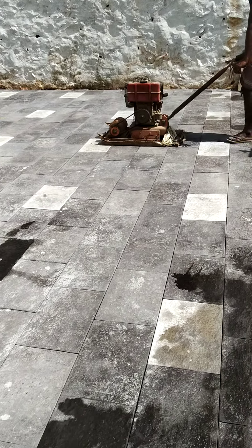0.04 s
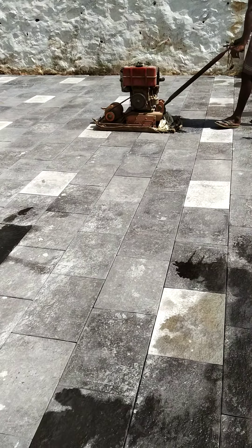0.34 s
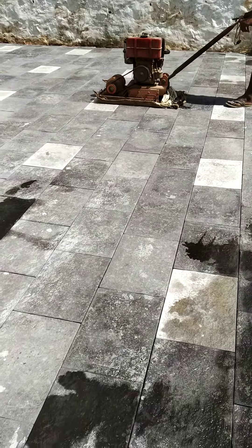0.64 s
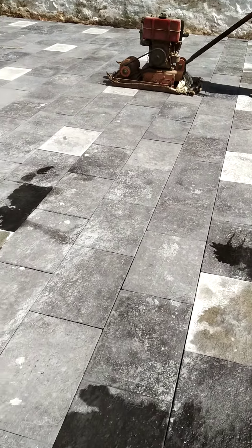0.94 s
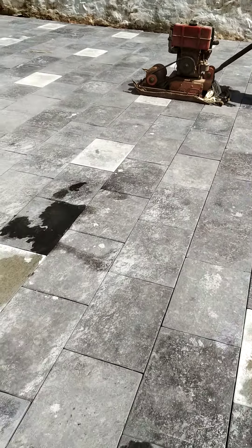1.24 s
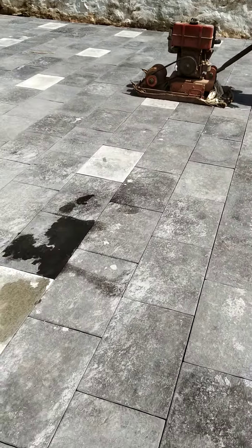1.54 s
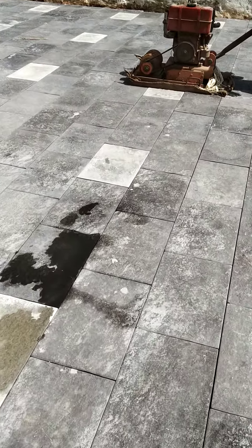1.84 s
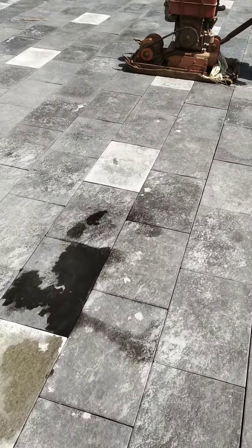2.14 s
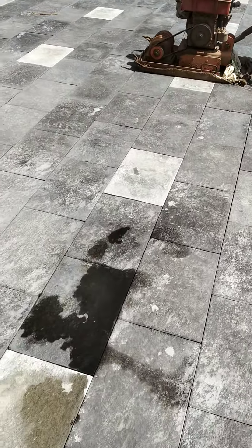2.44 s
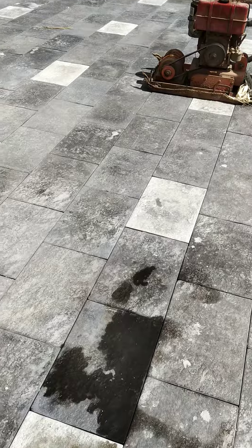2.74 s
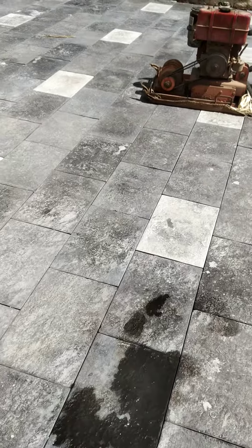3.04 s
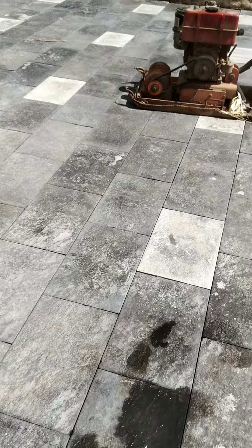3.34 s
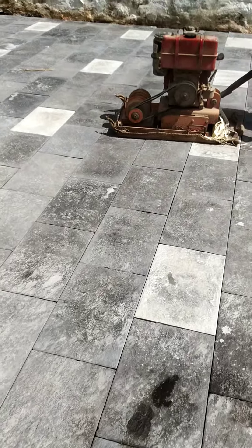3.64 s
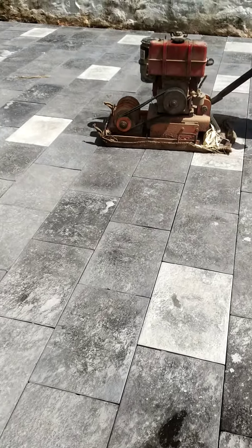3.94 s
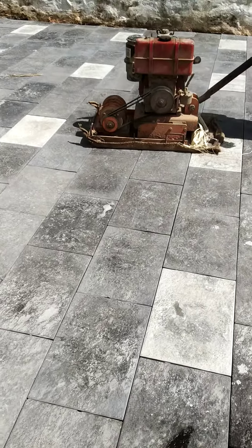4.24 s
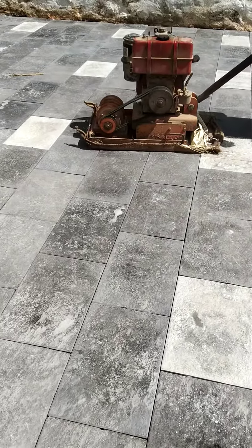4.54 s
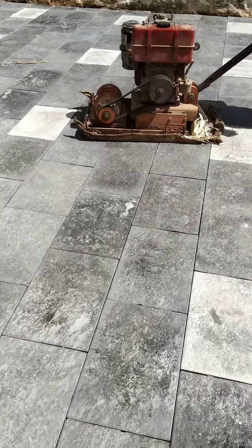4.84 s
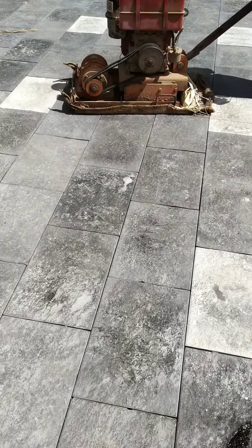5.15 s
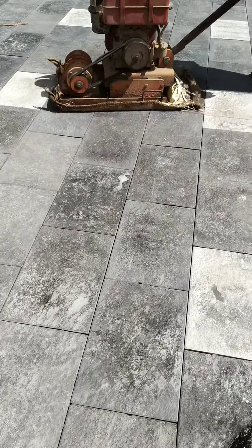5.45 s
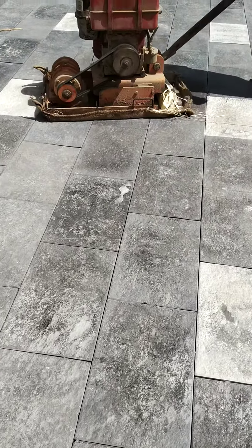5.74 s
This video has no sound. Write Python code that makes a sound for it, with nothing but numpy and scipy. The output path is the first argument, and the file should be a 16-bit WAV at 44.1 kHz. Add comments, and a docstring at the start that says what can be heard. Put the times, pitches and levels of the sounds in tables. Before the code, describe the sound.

A petrol plate compactor runs loudly for the whole of about six seconds, outdoors in a walled yard, heard in stereo. Its single-cylinder engine holds a steady, rapid beat, with a booming drone, a hollow exhaust bark and metallic ticking and rattling. The vibrating steel plate adds a low throbbing hum, hammers the paving tiles and grinds sand with a continuous hiss. Brief gritty, squealing scrapes stand out near 0.3, 0.8, 1.3 and 1.7 seconds. The tiles rattle harder around 1.1 and 1.7 seconds, and again near 3.9. A very faint high whistle of rubbing steel sits to the right, with tiny squeaks between 2.6 and 3.5 seconds. The hum is strongest from 3 to 4.5 seconds, and a quick metallic clinking comes forward from 4 to 4.7. The machine gradually sounds closer and fuller, still running at the end.

```python
"""A walled yard: a petrol plate compactor crawls closer over paving tiles.
Its four-stroke single booms, barks and ticks at about 24 cycles a second; a belt spins the eccentric
weight at 64 Hz, which throbs against the engine. The steel plate hammers the tiles and grinds sand,
with a few louder scrapes and a faint whistle of rubbing steel."""
import sys
import numpy as np
from scipy import signal
from scipy.fft import rfft, irfft, next_fast_len
from scipy.io import wavfile
from scipy.ndimage import uniform_filter1d, map_coordinates

SR = 44100
rng = np.random.default_rng(int(sys.argv[2]) if len(sys.argv) > 2 else 0)


def wrap_up_sound(samples):
    """Save the sound to the file named by the first command line argument, as 16-bit audio."""
    columns = np.atleast_2d(samples).T
    # keep every value between -1 and 1, then stretch to whole-number steps
    tamed = np.clip(columns, -1, 1)
    steps = np.round(tamed * 32767).astype(np.int16)
    wavfile.write(sys.argv[1], SR, steps)


N = 256220
TOP_HZ = 15700

# Each row: time in seconds, engine cycle rate in Hz, eccentric rate in Hz.
SHAFT_RATES = [(0.0, 23.92, 63.64), (0.45, 23.79, 63.79), (1.0, 23.87, 64.13), (1.7, 23.92, 63.96),
               (2.5, 23.96, 64.33), (3.3, 23.98, 64.06), (4.0, 23.83, 63.95), (4.5, 23.82, 63.68),
               (5.0, 23.76, 64.01), (5.4, 23.8, 63.58), (5.81, 23.84, 63.9)]
CYCLE_HZ = SHAFT_RATES[0][1]


def amp(db):
    """Decibels to gain."""
    return 10 ** (np.asarray(db) / 20)


def unit(x):
    """Scale to rms 1."""
    return x / np.sqrt(np.mean(x ** 2) + 1e-20)


def curves(rows):
    """Per-sample curve for each column after the time."""
    times_s, *columns = np.transpose(rows)
    return [np.interp(np.arange(N) / SR, times_s, column) for column in columns]


def bell(centre_s, width_s):
    """Gaussian envelope, 1/e at width_s from its centre."""
    return np.exp(-((np.arange(N) / SR - centre_s) / width_s) ** 2)


def swells(rows):
    """Sum of bell-shaped rises, in dB."""
    return sum(db * bell(centre_s, width_s) for centre_s, width_s, db in rows)


def approach(far_db, near_db):
    """Level in dB as the machine draws closer."""
    # Each row: time in seconds, nearness from 0 to 1.
    nearness = [(0, 0.19), (3, 0.5), (3.8, 0.74), (5.81, 1)]
    return far_db + (near_db - far_db) * curves(nearness)[0]


def wobble(rate_hz):
    """Smooth random curve through knots drawn at rate_hz."""
    knots = rng.standard_normal(int(N * rate_hz / SR) + 4)
    return map_coordinates(knots, [np.arange(N) * rate_hz / SR])


def noise():
    """White noise, independent in the two channels."""
    return rng.standard_normal((2, N))


def filtered(x, response):
    """Apply a complex frequency response."""
    size = next_fast_len(N + SR // 2)
    return irfft(rfft(x, size) * response(np.fft.rfftfreq(size, 1 / SR)), size)[..., :N]


def colour(points):
    """Response through (Hz, dB) points on a log axis."""
    hz, db = np.transpose(points)
    return lambda f: amp(np.interp(np.log(f + 1), np.log(hz), db))


def resonances(modes):
    """Causal response of (Hz, width in Hz, dB) modes, alternating in sign."""
    return lambda f: sum((-1) ** k * amp(db) * 1j * f * width / (hz * hz - f * f + 1j * f * width)
                         for k, (hz, width, db) in enumerate(modes))


def patchy(x, depth_db):
    """Vary the gain in random patches of time and frequency."""
    spectra = signal.stft(x, nperseg=512)[2]
    field = uniform_filter1d(rng.standard_normal(spectra.shape[1:]), size=9, axis=0)
    field = uniform_filter1d(field, size=12, axis=1)
    return signal.istft(spectra * amp(depth_db * unit(field)), nperseg=512)[1][:, :N]


def pulses(cycle, phase, spread_db=.8):
    """One impulse per engine cycle at the given phase, uneven in strength."""
    at = np.interp(np.arange(int(cycle[-1]) + 1) + phase, cycle, np.arange(N), left=-1, right=-1)
    at = np.round(at[at >= 0]).astype(int)
    return np.bincount(at, amp(spread_db * rng.standard_normal(len(at))), N)


def ring(x, t60_s, count=5):
    """Dense stereo ringing, crossfaded through several tails as the machine travels."""
    t = np.arange(SR // 8) / SR
    tails = rng.standard_normal((count, 2, len(t))) * amp(-60 * t / t60_s) * np.minimum(t / .004, 1)
    tails /= np.linalg.norm(tails, axis=-1, keepdims=True)
    travel = np.linspace(0, count - 1, N)
    return sum(np.sqrt(np.clip(1 - abs(travel - k), 0, 1))
               * signal.oaconvolve(x[None], tail, axes=1)[:, :N] for k, tail in enumerate(tails))


def placed(x, left_db, lag_s):
    """Mono to stereo: the left is left_db louder and lag_s later than the right."""
    side = np.array([[1], [-1]]) / 2
    return amp(left_db * side) * filtered(x, lambda f: np.exp(-2j * np.pi * f * lag_s * side))


def plate_hum(turns):
    """The eccentric shakes the plate: a throb once a turn, a hum twice a turn, wavering overtones."""
    # Each row: time in seconds, relative level in dB.
    throb_levels = [(0.08, -16.5), (2.66, -27.5), (3.65, -21), (5.5, -18), (5.7, -19)]
    hum_levels = [(0.0, -20), (.8, -17.5), (1.3, -14.5), (1.55, -16.5), (1.75, -18), (2.1, -12.5),
                  (2.55, -17), (3.0, -10), (3.7, -8.7), (4.05, -11), (4.45, -10.5), (4.68, -13.5),
                  (4.88, -22), (5.3, -19), (5.75, -17.5)]
    # Each row: multiple of the eccentric rate, level in dB.
    overtones = [(4, -33), (5, -38), (6, -38)]
    angle = 2 * np.pi * turns
    throb = amp(curves(throb_levels)[0] + 2 + .4 * wobble(11)) * np.cos(angle + .15)
    hum = amp(curves(hum_levels)[0] - 1 + .22 * wobble(9.1)) * np.cos(2 * angle)
    upper = sum(amp(db + 4.5 * wobble(4.95)) * np.cos(k * angle + np.pi * wobble(1.201))
                for k, db in overtones)
    return placed(throb + hum + upper, left_db=8.5, lag_s=.00011)


def engine_boom(cycle, waver_db, drift_turns):
    """Firing stroke and crank unbalance: clean low orders, a drone at order 8, unsteady high orders."""
    # Each row: time in seconds, relative level in dB.
    drone_levels = [(0.0, -35), (0.05, -24.5), (0.78, -23.5), (1.02, -29), (1.67, -29.5), (1.76, -22.5),
                    (2.04, -31), (2.39, -21.5), (2.86, -26), (3.17, -20.5), (4.13, -32), (4.4, -22.5),
                    (4.79, -25), (4.9, -18.5), (5.21, -23.5), (5.37, -36), (5.76, -21.5), (5.81, -44)]
    # Each row: multiple of the cycle rate, far level in dB, near level in dB.
    orders = [(2, -27.5, -20.5), (3, -31, -31.5), (4, -62, -24), (5, -21.5, -36), (6, -35, -28.5),
              (7, -38, -25.5), (9, -39.5, -37.5), (10, -37, -32), (11, -37.5, -46), (12, -35, -37),
              (13, -38, -41), (19, -37.5, -40), (23, -48, -39), (26, -52, -34.5)]
    tones = amp(curves(drone_levels)[0] + 2.5) * np.cos(2 * np.pi * 8 * cycle)
    for order, far_db, near_db in orders:
        looseness = min(order / 19, 1) ** 2
        level_db = approach(far_db, near_db) + waver_db * np.sqrt(looseness) * wobble(3.2)
        slip = looseness * (2 * rng.standard_normal() + drift_turns * wobble(.723))
        tones += amp(level_db) * np.cos(2 * np.pi * (order * cycle + slip))
    return placed(tones, left_db=6.5, lag_s=.00043)


def hammering(turns, slam_db):
    """Once a turn the plate slams the tiles, which rattle on their bed, harder at each jolt."""
    # Each row: centre in seconds, width in seconds, rise in dB.
    jolts = [(1.1, .13, 5), (1.7, .11, 4), (3.85, .3, 4.5), (4.55, .2, 2.5)]
    # Each row: frequency in Hz, gain in dB.
    tile_spectrum = [(20, -14), (60, -30), (100, 3), (150, 1.5), (250, -1.5), (370, 0), (480, -6),
                     (640, -11), (900, -13.5), (1250, -40), (2000, -21.5), (4000, -58)]
    level_db = approach(far_db=-27.5, near_db=-20.5) + swells(jolts)
    mid, side = noise() * amp(slam_db * np.cos(2 * np.pi * (turns - .78)))
    side = filtered(side, colour([(200, -28), (400, -33), (700, 4)]))  # keeps the bass narrow
    mid = placed(mid, left_db=5, lag_s=.000093)
    return amp(level_db) * unit(filtered(mid + [side, -side], colour(tile_spectrum)))


def sand(grain_db, surge_db):
    """Grains crack under the plate in dense clumps; at times it catches on grit and squeals."""
    # Each row: time in seconds, relative level in dB.
    grind_levels = [(0, -23.5), (2.5, -23), (3.4, -25), (4.4, -25), (5.5, -22)]
    # Each row: frequency in Hz, gain in dB.
    sand_spectrum = [(300, -53), (700, 3), (1000, 2), (1300, -5.5), (2000, -2), (2600, -4), (3400, -4),
                     (4300, -6), (5000, -1), (6000, -7), (7300, -7), (9000, -10), (11000, -14.5),
                     (13000, -15.5), (14300, -18.5), (15600, -27)]
    # Each row: centre in seconds, width in seconds, frequency in Hz, bandwidth in Hz, share lost.
    hiss_dips = [(.2, 0.63, 3100, 1700, 0.32), (3.55, 0.34, 3080, 700, 0.6), (5.75, .3, 5100, 1200, 0.36)]
    # Each row: centre in seconds, width in seconds, relative grit level in dB, pitch in Hz, squeal in dB.
    scrapes = [(.25, 0.077, -31.5, 930, -23), (0.845, 0.059, -30.5, 1660, -25.5),
               (1.32, .046, -33, 1100, -28), (1.654, 0.026, -31, 6700, -23), (1.73, 0.052, -37, 640, -25),
               (2.504, 0.12, -49, 1510, -32), (2.727, 0.018, -34, 7600, -35), (5.35, .3, -41, 1080, -35),
               (.1, 0.29, -54, 1350, -31), (.76, .05, -48, 312, -23), (1.13, 0.073, -48, 265, -25),
               (5.52, .14, -47, 885, -27)]
    level_db = curves(grind_levels)[0]
    clumps = amp(grain_db * wobble(900) + surge_db * wobble(25))
    grains = patchy(noise() * clumps, depth_db=1.5)
    hiss = unit(filtered(grains, colour(sand_spectrum))) * amp([[-.4], [.4]])
    for centre_s, width_s, hz, band_hz, lost in hiss_dips:
        hiss -= lost * bell(centre_s, width_s) * filtered(hiss, resonances([(hz, band_hz, 0)]))
    bright = colour([(1000, -13), (4000, -7), (7500, 1.5), (11000, -2), (15500, -13)])
    grit = unit(filtered(noise() * amp(3.3 * wobble(600)), bright))
    spurts_db = 2.2 * wobble(21.97)
    out = amp(level_db + 3) * hiss + amp(level_db - 14 + spurts_db) * grit
    for centre_s, width_s, grit_db, hz, squeal_db in scrapes:
        squeal = unit(filtered(noise(), lambda f: resonances([(hz, hz / 6, 0)])(f) ** 2))
        out += bell(centre_s, width_s) * (amp(grit_db + 5.5) * grit + amp(squeal_db) * squeal)
    return out


def clatter(cycle, rattle_lag_cycles=.027):
    """Valve gear and piston tick in the casing, shake loose parts and ring the fins, frame and tank."""
    # Each row: phase in cycles, level in dB, t60 in seconds.
    strikes = [(.07, -3, 0.038), (.16, 0, 0.051), (.33, -5.5, 0.068), (.6, 0, 0.072), (.89, -1.5, 0.037)]
    # Each row: frequency in Hz, bandwidth in Hz, gain in dB.
    fin_modes = [(1700, 8, -9.5), (1814, 7.6, 3.5), (1912, 31, -7.5), (2043, 15, -4)]
    # Each row: frequency in Hz, gain in dB.
    casing_spectrum = [(400, -54), (800, 10), (1060, -8), (1280, -4), (1420, 4), (1580, 0.5), (2000, -1.5),
                       (2650, -1), (3400, -9.5), (4200, -3.5), (4900, -11), (6000, -12.5), (8000, -10.5),
                       (15000, -38)]
    rattle_spectrum = [(1200, -22), (2400, -0.5), (3100, -5.5), (4100, 2.5), (5100, -3.5), (6200, -10),
                       (9000, -2.5), (15000, -40)]
    frame_spectrum = [(150, -42), (250, -7.5), (360, 5), (410, 0), (480, -6), (650, -14), (900, -59),
                      (1300, -53)]
    # Each row: centre in seconds, width in seconds, rise in dB.
    fin_swells = [(2.65, .5, 6)]
    frame_swells = [(.2, .15, 5), (1.0, .2, 9), (3.85, .45, 9)]
    ticks = sum(amp(db) * ring(pulses(cycle, phase), t60_s) for phase, db, t60_s in strikes)
    metal = colour([(1100, -28), (1650, -2), (2350, -3), (3500, 5)])
    fins = filtered(ticks, lambda f: resonances(fin_modes)(f) * metal(f))
    casing = filtered(ticks, colour(casing_spectrum))
    bursts = sum(amp(db - 60 * ((cycle - phase - rattle_lag_cycles) % 1) / CYCLE_HZ / t60_s)
                 for phase, db, t60_s in strikes)
    rattle = filtered(noise() * bursts * amp(3.7 * wobble(1200)), colour(rattle_spectrum))
    frame = filtered(placed(ticks[0], left_db=9.5, lag_s=.00017), colour(frame_spectrum))
    tank = filtered(ticks, colour([(380, -39), (470, 1), (600, 3), (740, -8), (1200, -28.5)]))
    return (amp(approach(far_db=-32.5, near_db=-38.5) + swells(fin_swells)) * unit(fins)
            + amp(approach(far_db=-28, near_db=-25)) * unit(casing)
            + amp(approach(far_db=-32.5, near_db=-29)) * unit(rattle)
            + amp(approach(far_db=-36, near_db=-30.5) + swells(frame_swells)) * unit(frame)
            + amp(approach(far_db=-42.5, near_db=-33)) * unit(tank))


def exhaust_bark(cycle, band_hz=11, echo_cycles=.2, wall_db=-2, yard_db=-15):
    """Two puffs a cycle ring the silencer's modes; a wall throws each back and the yard reverberates."""
    # Each row: phase in cycles, level in dB.
    puff_phases = [(.17, 0), (.684, -8)]
    silencer_hz = [742, 766, 837, 860, 885, 908]
    # Each row: time in seconds, then the level in dB of each silencer mode, low to high.
    mode_levels = [(0, -37, -46, -35, -30, -38, -48), (.35, -38, -41, -38, -27, -41, -44),
                   (.8, -43, -44, -38, -28, -29, -47), (1.15, -46, -44, -33, -39, -42, -52),
                   (1.5, -44, -49, -36, -38, -36, -41), (1.85, -37, -38, -30, -31, -41, -45),
                   (2.15, -38, -31, -44, -31, -41, -42), (2.5, -30, -39, -31, -37, -24, -47),
                   (2.9, -31.5, -32, -36, -37, -38, -44), (3.25, -35, -26.5, -29.5, -37, -34, -41),
                   (3.6, -36, -38, -40, -43, -39, -42), (4.1, -33.5, -40, -35.5, -34, -33, -36),
                   (4.8, -32.5, -40, -39, -42, -37, -32.5), (5.2, -37, -34, -47, -32, -43, -37),
                   (5.7, -33, -27, -40, -34, -35, -36)]
    puffs = sum(amp(db) * pulses(cycle, phase) for phase, db in puff_phases)
    echo = filtered(puffs, lambda f: np.exp(-2j * np.pi * f * echo_cycles / CYCLE_HZ))
    drive = (placed(puffs, left_db=-1, lag_s=.0002)
             + amp(wall_db) * placed(echo, left_db=1, lag_s=.0002)
             + amp(yard_db) * ring(puffs, t60_s=.06))
    drive = filtered(drive, colour([(300, -22), (620, -14), (730, 4), (910, 4), (1050, -12), (2000, -36)]))
    return sum(amp(db) * unit(filtered(drive, resonances([(hz, band_hz, 0)])))
               for db, hz in zip(curves(mode_levels), silencer_hz))


def exhaust_chuff(cycle, waver_db, peak_phase=.92):
    """Three neighbouring engine orders beat once a cycle: the exhaust's hollow throb."""
    # Each row: time in seconds, then the relative levels in dB of orders 14, 15 and 16.
    order_levels = [(0, -48, -23, -38), (.4, -44, -34.5, -21.5), (.8, -35, -30, -42), (1.25, -47, -46, -46),
                    (1.85, -39, -30, -32), (2.6, -29.5, -30, -42), (3.5, -29, -28.5, -35),
                    (4.0, -37, -30, -27), (4.4, -35, -36, -27), (4.8, -36, -24.5, -28),
                    (5.2, -31, -29, -31), (5.7, -43, -33, -33)]
    tones = sum(amp(db + waver_db * wobble(9.5))
                * np.cos(2 * np.pi * order * (cycle - peak_phase) + .22 * wobble(12))
                for order, db in enumerate(curves(order_levels), 14))
    return placed(amp(1) * tones, left_db=5.5, lag_s=.00025)


def plate_bounce(turns):
    """On loose tiles the plate skips higher every second turn, adding tones between its overtones."""
    # Each row: time in seconds, relative level in dB.
    bounce_levels = [(0.0, -34), (0.06, -38), (1.0, -37), (1.54, -31), (1.89, -37), (3.53, -50),
                     (3.62, -36), (3.98, -45), (4.24, -23), (5.81, -33)]
    # Each row: multiple of half the eccentric rate, relative level in dB.
    half_orders = [(3, -1.5), (5, -1), (7, -2), (9, -5), (11, -5.5)]
    tones = sum(amp(db + 3.1 * wobble(3.9)) * np.cos(np.pi * k * turns + np.pi * wobble(.817))
                for k, db in half_orders)
    return placed(amp(curves(bounce_levels)[0] + 1.3) * tones, left_db=-4, lag_s=.00014)


def head_clink(cycle, engine_hz, length_s=.0125):
    """Combustion knocks the cylinder head: one short ping a cycle, with a little buzz."""
    # Each row: time in seconds, pitch in Hz, relative level in dB.
    pings = [(0, 1975, -39), (1.1, 1990, -36.5), (1.9, 2030, -34), (2.6, 2000, -35), (3.2, 2040, -33.5),
             (3.7, 2085, -31), (4.2, 2095, -27), (4.4, 2085, -29), (4.7, 2075, -29.5), (4.9, 2050, -44),
             (5.81, 2060, -44)]
    hz, db = curves(pings)
    stroke, phase = np.divmod(cycle + .405, 1)
    age_s = phase / engine_hz
    strength_db = .7 * rng.standard_normal(int(stroke[-1]) + 1)[stroke.astype(int)]
    envelope = amp(strength_db) * np.sin(np.pi * np.minimum(age_s / length_s, 1))
    tone = unit(envelope * np.sin(2 * np.pi * hz * age_s))
    buzz = unit(filtered(noise() * envelope, colour([(1600, -27), (2100, -6), (2500, -1), (3000, -19)])))
    direct = placed(tone, left_db=0, lag_s=.00009)
    return amp(db - 1) * (direct + amp(-7) * ring(tone, t60_s=.07) + amp(-5) * buzz)


def sheet_metal(cycle):
    """Panels sing along with high engine orders: thin tones that come and go."""
    # Each row: multiple of the cycle rate, centre in seconds, width in seconds, relative peak in dB.
    notes = [(45, .6, 1.0, -39), (56, .15, .3, -36), (59, .3, .5, -39), (68, .75, .5, -36),
             (71, .2, .3, -37), (71, 1.55, .35, -31), (71, 2.6, .55, -32), (81, 2.65, .4, -35),
             (68, 3.1, .5, -38), (85, 3.2, .3, -35), (60, 3.3, .4, -37), (58, 2.4, .3, -37),
             (62, 4, .58, -39), (38, 4.5, .8, -44), (50, 5.1, 1.0, -39), (52, 5.0, .9, -39),
             (54, 5.1, 1.0, -40), (56, 5.5, .5, -37)]
    tones = sum(amp(db) * bell(centre_s, width_s)
                * np.cos(2 * np.pi * (order * cycle + rng.random()) + .17 * wobble(5))
                for order, centre_s, width_s, db in notes)
    return placed(amp(2) * tones, left_db=4.5, lag_s=.00022)


def steel_whistle():
    """Rubbing steel sings faintly to the right at two high pitches, the lower one fitfully."""
    # Each row: frequency in Hz, bandwidth in Hz, gain in dB.
    modes = [(11790, 60, 0), (13950, 260, 0)]
    # Each row: centre in seconds, width in seconds, rise in dB.
    squeaks = [(2.58, .03, 11), (2.68, .03, 12), (2.89, .02, 11), (3.18, .035, 20), (3.33, .07, 16),
               (3.52, .08, 8)]
    lower, upper = (unit(filtered(noise(), lambda f: resonances([mode])(f) * (f > TOP_HZ / 2)))
                    for mode in modes)
    lower_db = -52 + swells(squeaks) + 2.5 * wobble(40)
    upper_db = -44 + 2.2 * wobble(9)
    return (amp(lower_db) * lower + amp(upper_db) * upper) * amp([[-2], [2]])


def scene():
    """Engine and eccentric each run on their own shaft angle."""
    engine_hz, eccentric_hz = curves(SHAFT_RATES)
    cycle = np.cumsum(engine_hz) / SR + .177
    turns = np.cumsum(eccentric_hz) / SR - .166
    engine = (engine_boom(cycle, waver_db=2.3, drift_turns=.26) + exhaust_chuff(cycle, waver_db=.5)
              + exhaust_bark(cycle) + head_clink(cycle, engine_hz) + clatter(cycle) + sheet_metal(cycle))
    plate = (plate_hum(turns) + plate_bounce(turns) + hammering(turns, slam_db=2.5)
             + sand(grain_db=.35, surge_db=.72))
    return engine + plate + steel_whistle()


def record(dry):
    """Stereo microphone: narrow bass, wide midrange, rounded peaks, nothing above TOP_HZ."""
    # Each row: frequency in Hz, side gain in dB.
    stereo_width = [(100, -12.5), (600, 2), (1200, 1.5), (2400, 2.5), (4500, 0)]
    mid = (dry[0] + dry[1]) / 2
    side = filtered((dry[0] - dry[1]) / 2, colour(stereo_width))
    wide = np.array([mid + side, mid - side])
    limited = wide / (1 + np.abs(wide / .95) ** 8) ** (1 / 8)
    return filtered(limited, lambda hz: hz < TOP_HZ)


dry = scene()
out = record(dry)
wrap_up_sound(out)
```